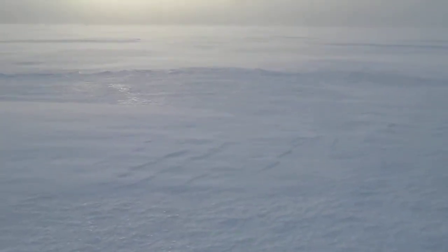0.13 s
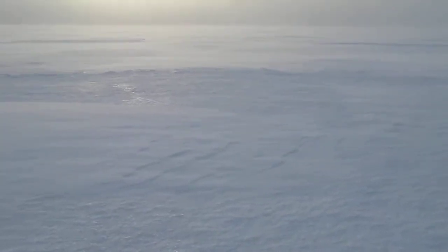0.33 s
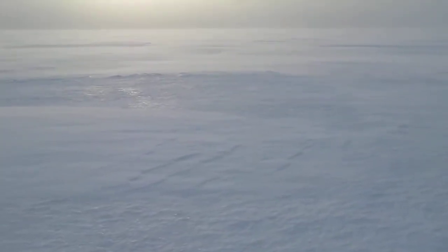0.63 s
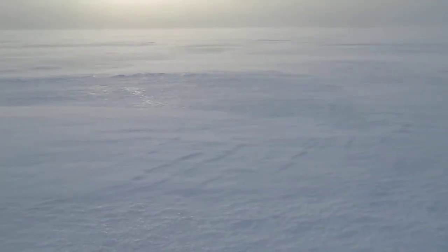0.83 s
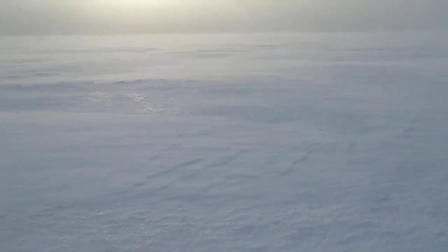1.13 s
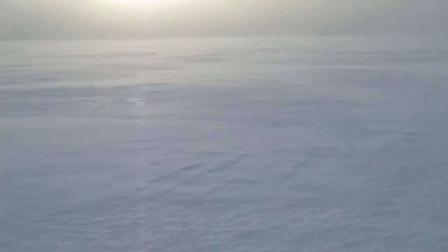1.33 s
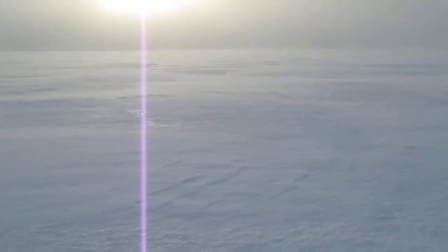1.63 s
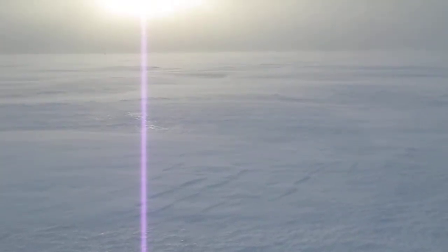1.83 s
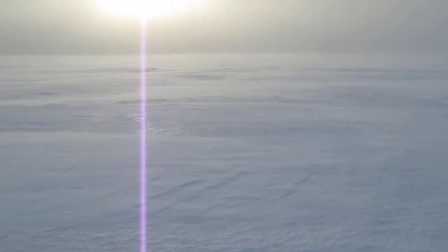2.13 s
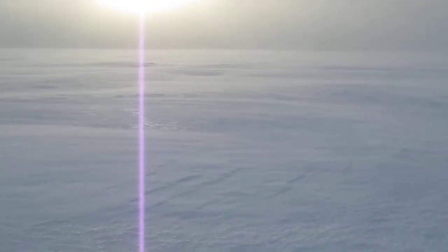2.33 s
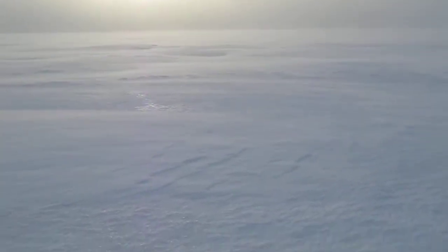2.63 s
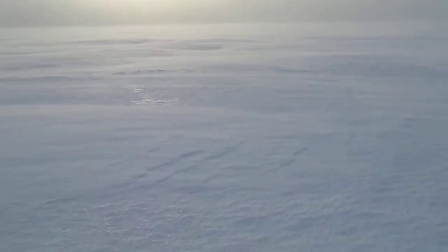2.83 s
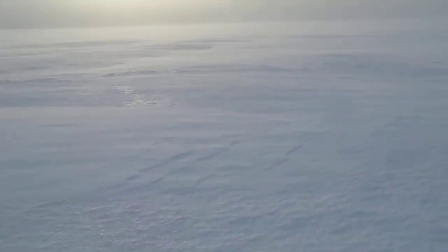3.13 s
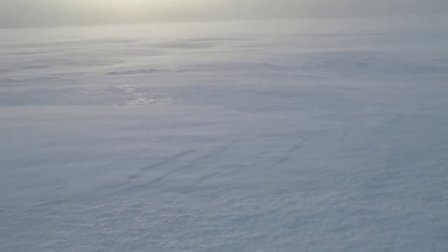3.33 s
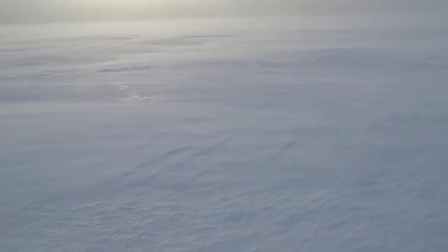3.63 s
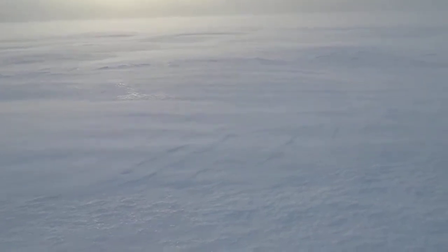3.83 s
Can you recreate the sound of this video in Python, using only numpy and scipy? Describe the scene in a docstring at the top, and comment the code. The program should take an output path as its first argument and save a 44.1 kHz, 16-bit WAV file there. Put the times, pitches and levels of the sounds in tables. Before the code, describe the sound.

Wind rumbles and thumps on a microphone over open snow, with thin hissing drift and gritty ticks.

```python
"""A low wind rumble grows to a roar on a small camera over open snow: turbulence, coloured noise.
Short puffs flutter (lumpy low noise) and slaps of air thump (single pulses) on the microphone port.
Drifting snow hisses thin and high; a swipe slides down in pitch, then grit brushes the housing with
scattered ticks (noise, impulses, short cosines). A far hiss and two faint whistles lie beneath.
Overloads clip, and the gain ducks just after the strongest."""
import sys
import numpy as np
from scipy import signal
from scipy.fft import rfft, irfft, next_fast_len
from scipy.io import wavfile
from scipy.ndimage import uniform_filter1d, minimum_filter1d, map_coordinates

SR = 44100
rng = np.random.default_rng(int(sys.argv[2]) if len(sys.argv) > 2 else 0)


def rack_gain(trim_db):
    """Turn a fader trim in dB into the linear factor to multiply a signal by."""
    fader = np.asarray(trim_db, float)
    return 10 ** (fader / 20)


def unload_audio(sound):
    """Save the sound as a 16-bit wav file, at the path given as the first command line argument."""
    columns = np.transpose(np.atleast_2d(sound))
    # keep every value between -1 and 1, then stretch to whole-number steps
    steps = np.round(np.clip(columns, -1, 1) * 32767)
    wavfile.write(sys.argv[1], SR, steps.astype(np.int16))


N = 176400

# far hiss spectrum: freq_hz, relative_density_db_per_hz
FLOOR_SPECTRUM = [(180, -19.5), (300, -6), (700, -17), (2270, -30.5), (6000, -34.5), (9900, -34.5),
                  (15800, -50)]
FLOOR_START_DB, FLOOR_STEP_S, FLOOR_STEP_DB = -58, 2.8, -4
# faint thin tones: start_s, end_s, start_pitch_hz
WHISTLES = [(1.23, 1.33, 3290), (1.44, 1.59, 3230)]
WHISTLE_PEAK_DB, WHISTLE_RISE_HZ_PER_S = -72, 600
# drifting snow hiss: time_s, level_db
DRIFT_LEVEL = [(0, -69), (.28, -67), (.33, -61), (.49, -59), (.6, -62.5), (.62, -68), (.76, -61),
               (.85, -57.5), (1.1, -61), (1.27, -65), (2.1, -61), (2.21, -58.5), (2.33, -51.5),
               (2.37, -45.5), (2.45, -51), (2.52, -58), (2.57, -50), (2.6, -53.5), (2.68, -54.5),
               (3.0, -65.5)]
# drifting snow spectrum: freq_hz, relative_density_db_per_hz
SNOW_SPECTRUM = [(900, -0.5), (1500, -6.5), (4600, -6), (6400, -6), (8300, 0.5), (9800, -4), (13200, -20.5),
                 (15800, -44)]
# swipe past the port: time_s, level_db, centre_hz
SWISH = [(2.69, -58, 9200), (2.712, -34, 9100), (2.74, -30, 6800), (2.77, -33, 3650), (2.8, -51, 2590),
         (2.83, -61, 2550)]
SWISH_WIDTH_OCTAVES, SWISH_SKIRT_DB = 0.55, 1.5
# treble loss of the swipe through the housing: freq_hz, gain_db
HOUSING_LOSS = [(20, 0), (7000, 0), (16000, -16)]
# short clicks, the sharp edge of an air slap at 2.16 s, then ice grains on the housing:
# time_s, peak_db, pitch_hz
TICKS = [(2.1606, -9.5, 1560), (2.5865, -33, 8100), (2.7789, -8.5, 3520), (2.8146, -25, 7000),
         (2.879, -19, 7500), (2.9155, -23, 3500), (2.9305, -22.5, 2310), (3.0875, -21.5, 4870),
         (3.1935, -11, 5400), (3.2939, -30, 6000), (3.4235, -23.5, 6000), (3.7136, -32.5, 5900),
         (3.942, -34.5, 6000)]
# grit on the housing: time_s, level_db
BRUSH_LEVEL = [(2.79, -39.5), (2.862, -55), (2.874, -29.5), (2.93, -48.5), (2.992, -48.5), (3.005, -30.5),
               (3.04, -37), (3.09, -35), (3.115, -45), (3.19, -36), (3.27, -38), (3.31, -34.5),
               (3.34, -39.5), (3.41, -40.5), (3.5, -49.5), (3.55, -42), (3.65, -50), (4, -48.5)]
# grit spectrum: freq_hz, relative_density_db_per_hz
GRIT_SPECTRUM = [(240, 3), (700, -4.5), (1430, -9.5), (4270, -17.5), (6500, -27), (11400, -42.5),
                 (15800, -57)]
GRAINS_PER_S, GRAIN_SPREAD_DB, GRAIN_RE_RUSH_DB = 500, 2.6, -9
# fluttering puffs on the port: start_s, length_s, level_db, top_hz
PUFFS = [(0.725, 0.037, -41, 316), (0.776, 0.034, -41, 295), (0.854, 0.02, -41.5, 310),
         (1.904, 0.056, -28.5, 334), (2.134, 0.0084, -10.5, 620), (2.142, 0.015, -13, 627),
         (2.165, 0.021, -15.5, 600), (2.288, 0.089, -28, 394), (2.472, 0.076, -33.5, 430),
         (2.542, 0.18, -31.5, 474), (3.676, 0.032, -26, 493), (3.965, 0.03, -21, 410)]
PUFF_LOW_HZ, PUFF_SKEW = 126, 0.54  # a skew below 1 puts the peak early
PUFF_LUMPS_DB, PUFF_LUMP_S = 5, .002
# inward slaps of air on the diaphragm: time_s, peak_db, width_ms
SLAPS = [(.478, -22.5, 0.83), (0.7375, -21.5, 0.85), (1.921, -24.5, 0.53), (2.084, -14.5, 0.54),
         (2.1327, 2, .27), (2.1611, 1, .55), (2.1643, 0, .4), (2.2963, -17.5, 0.57), (2.315, -17, 0.35),
         (2.324, -20, 0.31), (2.353, -22, 0.32), (2.646, -21.5, 0.31)]
# outward suck just before the hardest slap: time_s, peak_db, width_ms
PULL = (2.1277, -7.5, .75)
# wind rumble: time_s, level_db
WIND_LEVEL = [(0, -36.5), (.43, -42), (.9, -42.5), (.99, -32.5), (1.05, -41), (1.55, -31.5), (1.83, -39),
              (1.93, -28), (2.02, -29), (2.08, -22.5), (2.17, -18.5), (2.19, -26.5), (2.26, -36),
              (2.32, -23.5), (2.4, -32), (2.52, -31.5), (3.15, -33), (3.22, -24.5), (3.455, -25.5),
              (3.475, -14.5), (3.57, -20), (3.7, -14), (3.89, -17), (4, -11.5)]
# light wind spectrum: freq_hz, relative_density_db_per_hz
LIGHT_SPECTRUM = [(8.8, -46), (15, -3), (65, -8.5), (196, -21), (299, -31), (3000, -65.5), (6600, -120)]
# strong wind spectrum: freq_hz, relative_density_db_per_hz
STRONG_SPECTRUM = [(9, -50), (15, -21), (59, 3), (151, -0.5), (330, -18), (500, -26.5), (1500, -41),
                   (5000, -62), (11000, -120)]
LIGHT_DB, STRONG_DB = -30, -17  # the colour turns from light to strong between these levels
DUCK_ABOVE_PEAK, DUCK_DB, DUCK_HOLD_S, CLIP_PEAK = .85, -8, .038, .71


def unit(x):
    """Scaled to rms 1."""
    return x / np.sqrt(np.mean(x ** 2) + 1e-20)


def curve(rows, column=1):
    """One column of timed rows at every sample, -120 outside the rows."""
    cols = np.transpose(rows)
    return np.interp(np.arange(N) / SR, cols[0], cols[column], left=-120, right=-120)


def wobble(knots_per_s):
    """Smooth random curve through normal knots."""
    knots = rng.standard_normal(int(N * knots_per_s / SR) + 4)
    return map_coordinates(knots, [np.arange(N) * knots_per_s / SR])


def coloured(x, spectrum):
    """Filters x by (freq_hz, db) points joined on log frequency."""
    m = next_fast_len(N + 8192)
    f, db = np.transpose(spectrum)
    gain_db = np.interp(np.log(np.fft.rfftfreq(m, 1 / SR) + 1), np.log(f), db)
    return irfft(rfft(x, m) * rack_gain(gain_db), m)[:N]


def rush(spectrum, patchy_db):
    """Coloured noise of rms 1 with random gain patches in time and frequency."""
    z = signal.stft(rng.standard_normal(N), nperseg=512)[2]
    field = uniform_filter1d(rng.standard_normal(z.shape), size=8, axis=0)
    field = uniform_filter1d(field, size=8, axis=1)
    patchy = signal.istft(z * rack_gain(patchy_db * unit(field)), nperseg=512)[1][:N]
    return unit(coloured(patchy, spectrum))


def add(out, s, x):
    """Mixes x into out from time s."""
    part = out[round(s * SR):][:len(x)]
    part += x[:len(part)]


def whistles():
    """Faint sines gliding upward, with 10 ms fades."""
    t = np.arange(N) / SR
    out = np.zeros(N)
    for start_s, end_s, start_hz in WHISTLES:
        level = rack_gain(WHISTLE_PEAK_DB + 1.5 * wobble(20))
        fade = np.clip(np.minimum(t - start_s, end_s - t) * 100, 0, 1)
        pitch_hz = start_hz + WHISTLE_RISE_HZ_PER_S * (t - start_s)
        out += level * fade * np.sin(2 * np.pi * np.cumsum(pitch_hz) / SR)
    return out


def background():
    """Far hiss, stepping down as the brushing starts, plus the whistles."""
    t = np.arange(N) / SR
    level_db = FLOOR_START_DB + FLOOR_STEP_DB * (t > FLOOR_STEP_S)
    return rack_gain(level_db) * rush(FLOOR_SPECTRUM, patchy_db=2.3) + whistles()


def grains():
    """Sparse impulses of uneven size and random sign."""
    hits = rng.random(N) < GRAINS_PER_S / SR
    size = rack_gain(GRAIN_SPREAD_DB * rng.exponential(size=N))
    return hits * size * rng.choice([-1, 1], N)


def drift():
    """Fine snow hissing past as flickering noise, single crystals pricking through as impulses."""
    hiss = rack_gain(1.2 * wobble(150)) * rush(SNOW_SPECTRUM, patchy_db=1.3)
    crystals = rack_gain(GRAIN_RE_RUSH_DB) * unit(coloured(grains(), SNOW_SPECTRUM))
    return rack_gain(curve(DRIFT_LEVEL)) * (hiss + crystals)


def swish():
    """One dense swipe past the port: its bright noise band slides down as it slows."""
    hz, t, z = signal.stft(rng.standard_normal(N), SR, nperseg=256)
    s, _, centre_hz = np.transpose(SWISH)
    octaves = np.log2((hz[:, None] + 1) / np.interp(t, s, centre_hz))
    band = np.exp(-(octaves / SWISH_WIDTH_OCTAVES) ** 2 / 2)
    shape = band + rack_gain(SWISH_SKIRT_DB) / (1 + 4 ** octaves)  # skirt below the centre
    shape = shape / np.sqrt(np.mean(shape ** 2, axis=0))
    noise = unit(signal.istft(z * shape, SR, nperseg=256)[1][:N])
    return coloured(rack_gain(curve(SWISH) + 1.1 * wobble(140)) * noise, HOUSING_LOSS)


def ticks():
    """Short clicks, an air slap's sharp edge then ice grains: about one cosine cycle under a Gaussian."""
    out, t = np.zeros(N), np.arange(-40, 40) / SR
    for s, peak_db, hz in TICKS:
        pulse = np.exp(-17 * (hz * t) ** 2) * np.cos(2 * np.pi * hz * t)
        add(out, s + t[0], -rack_gain(peak_db) * pulse)
    return out


def brushing():
    """Grit dragged over the housing: a scratchy noise rush with sparse sharp grains."""
    grit = grains()
    edges = np.diff(grit, prepend=0) + 0.3 * grit  # treble-tilted impulses
    sharp = rack_gain(GRAIN_RE_RUSH_DB) * unit(coloured(edges, GRIT_SPECTRUM))
    scratch = rack_gain(2.9 * wobble(120)) * rush(GRIT_SPECTRUM, patchy_db=0.5)
    return rack_gain(curve(BRUSH_LEVEL)) * (scratch + sharp)


def puffs():
    """Eddies on the port: short flutters of band-limited noise in uneven lumps."""
    out = np.zeros(N)
    high = signal.butter(1, PUFF_LOW_HZ, "high", fs=SR, output="sos")
    for s, length_s, level_db, top_hz in PUFFS:
        low = signal.butter(2, top_hz, fs=SR, output="sos")
        u = np.linspace(0, 1, round(length_s * SR))
        noise = rng.standard_normal(len(u)) * np.sin(np.pi * u ** PUFF_SKEW)
        lumps = np.repeat(rng.standard_normal(100), round(PUFF_LUMP_S * SR))[:len(u)]
        padded = np.pad(noise * rack_gain(PUFF_LUMPS_DB * lumps), (0, 3 * len(u)))  # room to ring
        flutter = signal.sosfilt(np.vstack([low, low, high]), padded)
        add(out, s, rack_gain(level_db) / 2 * unit(flutter))  # half: rms is taken over 4 lengths
    return out


def slaps():
    """Air hitting the diaphragm: single inward (negative) pulses, the pull an outward one."""
    out = np.zeros(N)
    for (s, peak_db, width_ms), way in [(slap, -1) for slap in SLAPS] + [(PULL, 1)]:
        u = np.arange(-300, 300) / SR * 1000 / width_ms
        pulse = (1 - 0.58 * u ** 2) * np.exp(-u ** 2 / 2)
        add(out, s - 300 / SR, way * rack_gain(peak_db) * pulse)
    return out


def rumble():
    """Turbulence on the port: lumpy low noise, fuller in the mids as the wind grows."""
    db = curve(WIND_LEVEL)
    share = np.clip((db - LIGHT_DB) / (STRONG_DB - LIGHT_DB), 0, 1)
    light = unit(rack_gain(1.9 * wobble(25.98)) * rush(LIGHT_SPECTRUM, patchy_db=2.0))
    strong = unit(rack_gain(1.4 * wobble(25)) * rush(STRONG_SPECTRUM, patchy_db=1.5))
    return rack_gain(db) * (np.sqrt(1 - share) * light + np.sqrt(share) * strong)


def scene():
    """All sources at one microphone."""
    snow = drift() + swish() + brushing()
    wind = puffs() + slaps() + rumble()
    return (background() + snow + ticks() + wind)[None]


def roll_off(x):
    """The treble ends steeply here."""
    return signal.sosfilt(signal.butter(12, 15910, fs=SR, output="sos"), x)


def record(dry):
    """Gain drops just after an overload and holds; the overload itself clips."""
    hold = round(DUCK_HOLD_S * SR)
    calm = minimum_filter1d(1. * (np.abs(dry) < DUCK_ABOVE_PEAK), hold)
    calm = uniform_filter1d(calm, size=45)  # 1 ms edges
    delay = hold // 2 + 45  # puts the duck after its overload
    calm = np.pad(calm, ((0, 0), (delay, 0)), constant_values=1)[:, :N]
    ducked = dry * rack_gain(DUCK_DB * (1 - calm))
    return roll_off(np.clip(ducked, -CLIP_PEAK, CLIP_PEAK))


dry = scene()
out = record(dry)
unload_audio(out)
```